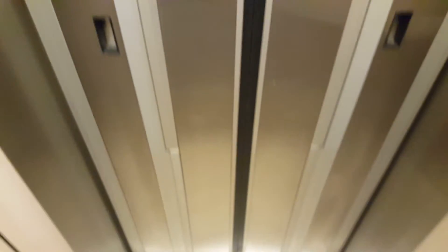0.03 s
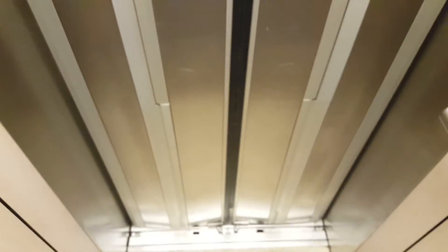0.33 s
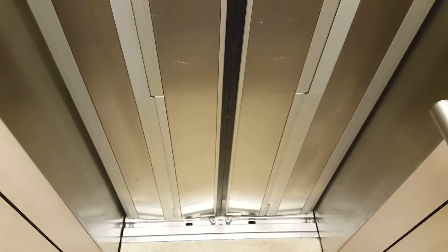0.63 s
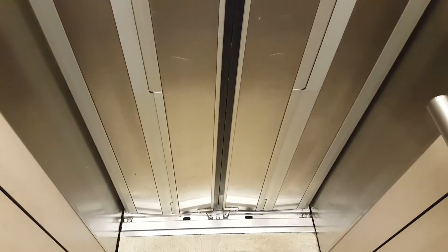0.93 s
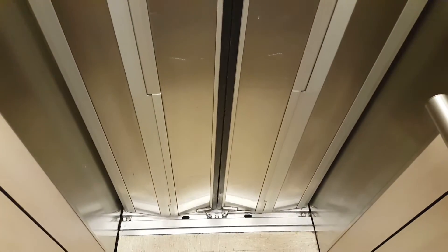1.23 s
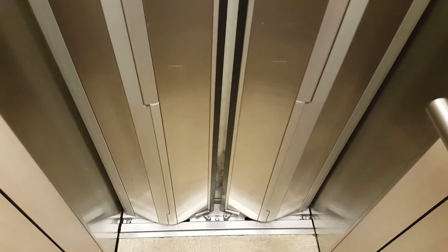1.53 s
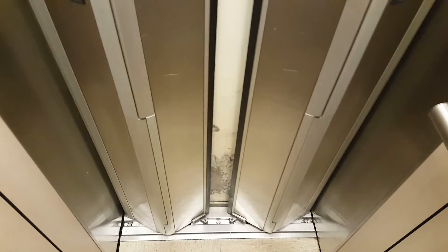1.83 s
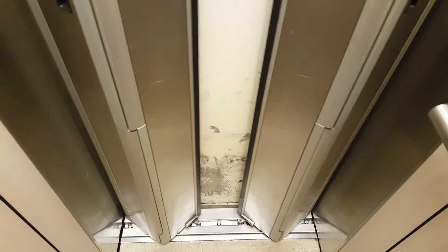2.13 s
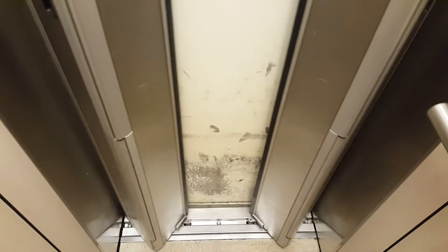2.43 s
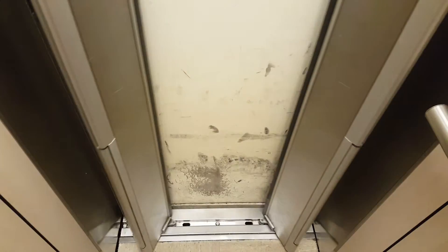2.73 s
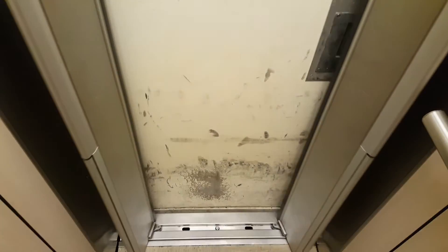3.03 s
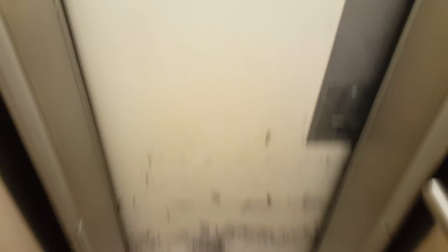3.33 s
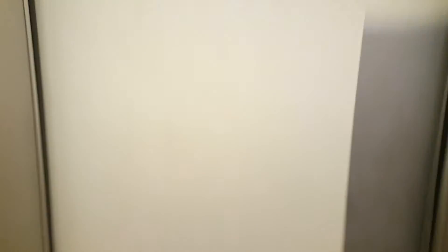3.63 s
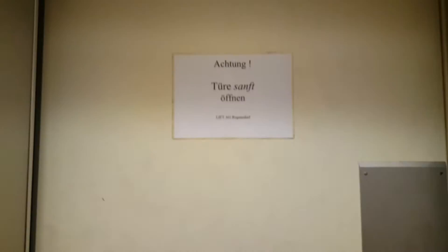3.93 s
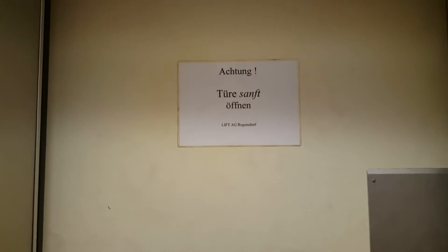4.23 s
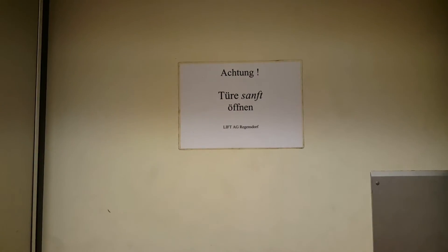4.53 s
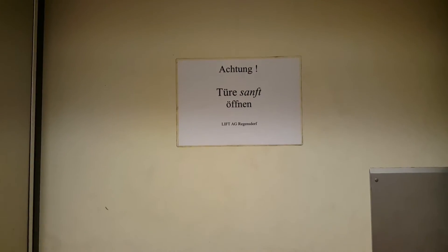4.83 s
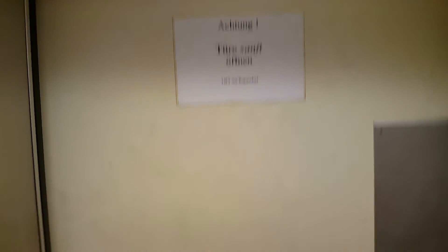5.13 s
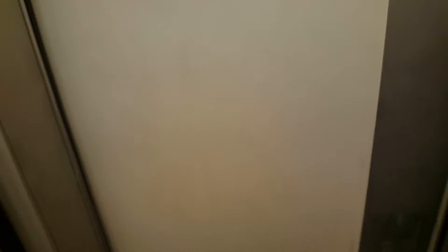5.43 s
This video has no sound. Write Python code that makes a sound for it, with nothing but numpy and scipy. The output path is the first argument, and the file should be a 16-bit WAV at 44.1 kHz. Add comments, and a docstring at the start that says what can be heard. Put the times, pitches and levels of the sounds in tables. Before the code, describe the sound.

Heard up close in a small lift, metal folding doors roll open over a soft machine hum, with uneven rumbling, hollow knocks and sharp ringing clacks. They land with a short squeak and a booming clunk. The rumble dies away, followed by a swish of clothing and a tap on the microphone. Only the faint hum remains until the door drive and rollers start up again near the end.

```python
"""Inside a small lift cabin, stereo microphones close to someone who turns and shifts in rustling clothes.
The lift's hum drops as the steel folding doors open: rollers rumble through the hollow panels,
latch and hinges clack, a linkage rod rings, and the leaves hit their stop with a squeak and a clunk.
A finger bumps the microphone case. After a pause the door drive starts up again."""
import sys
import numpy as np
from scipy import signal
from scipy.fft import rfft, irfft
from scipy.io import wavfile
from scipy.ndimage import uniform_filter1d

SR = 44100
rng = np.random.default_rng(int(sys.argv[2]) if len(sys.argv) > 2 else 0)


def transcribe(u):
    """Save the signal u as a 16-bit wav file named by the first command-line argument.

    u: samples, shape (n,) or (channels, n), limited to [-1, 1]; the rate is SR.
    q: integer samples, one column per channel.
    """
    v = np.clip(np.atleast_2d(u).T, -1, 1)
    q = np.round(v * 32767).astype(np.int16)
    wavfile.write(sys.argv[1], SR, q)


N = 250488
T = np.arange(N) / SR
STOP_S, SLAM_S = 2.669, 2.764  # the leaves meet the stop, then slam home

# modes of the hollow door panels: f/Hz, level/dB, t60/s
PANEL_MODES = [(55.5, 0, 0.71), (91.2, -7, 0.94), (110.1, 0, 1.8), (133.6, -5, 0.34), (173.5, 0, 1.54),
               (209, -10, 0.73), (243.3, -5.5, 0.52), (263, -2.5, 1.18), (299.6, -8, 0.69),
               (346.8, -10.5, 0.39), (420, -11.5, 0.34), (465, -16.5, 0.86), (542.3, -13, 0.65),
               (667, -24.5, 0.36), (848, -19.5, 0.59)]
# stereo width of the cabin at the microphones: f/Hz, side minus mid/dB
STEREO_WIDTH = [(50, -29), (125, -14), (250, -6), (500, -6.5), (1000, 0), (4000, 0)]


def undb(db):
    """Decibels to gain."""
    return 10 ** (np.asarray(db) / 20)


def at_hz(hz, points):
    """Read (Hz, value) points on a log-frequency axis."""
    f, values = np.transpose(points)
    return np.interp(np.log(np.maximum(hz, 1)), np.log(f), values)


def freqs(size):
    """Frequencies of the bins of a spectrum."""
    return np.arange(size // 2 + 1) * SR / size


def peak(f, hz, width_hz):
    """Gain of a narrow resonance."""
    return 1 / (1 + (2 * (f - hz) / width_hz) ** 2)


def ripple(f, step_hz):
    """Crowded resonances of sheet metal: a random pattern over frequency."""
    return np.interp(f / step_hz, np.arange(1024), 1.64 * rng.standard_normal(1024))


def since(s):
    """Seconds gone by since time s, 0 before it."""
    return np.maximum(T - s, 0)


def fade(t, t60):
    """Exponential decay, 60 dB down after t60."""
    return np.exp(-np.log(1000) * t / t60)


def walk(rate_hz):
    """Smooth random drift around zero."""
    hold = int(SR / rate_hz)
    steps = np.repeat(rng.standard_normal(N // hold + 1), hold)
    return uniform_filter1d(uniform_filter1d(steps, hold), hold)[:N]


def add(out, s, x):
    """Mix x into out at time s."""
    i = max(int(s * SR), 0)
    out[:, i:i + x.shape[1]] += x[:, :max(N - i, 0)]


def blows(hits, response):
    """Play one stereo response at each (t/s, level/dB)."""
    out = np.zeros((2, N))
    for s, db in hits:
        add(out, s, undb(db) * response)
    return out


def noise(gain, size=N):
    """Stereo cabin noise of rms 1 with spectrum gain(Hz): bass alike on both sides, treble diffuse."""
    f = freqs(size)
    mid, side = rfft(rng.standard_normal((2, size)))
    width = undb(at_hz(f, STEREO_WIDTH))
    pair = np.array([mid + width * side, mid - width * side]) / np.hypot(1, width)
    shaped = irfft(gain(f) * pair, size)
    return shaped / np.sqrt(np.mean(shaped ** 2))


def tick(hz, octaves, decay_s):
    """A short dying burst of noise around one pitch."""
    t = T[:2 ** 12]
    band = noise(lambda f: np.exp(-.5 * (np.log2((f + 1) / hz) / octaves) ** 2), len(t))
    return band * np.exp(-t / decay_s)


def ring(modes, size, rise_s, flutter_db, flutter_hz):
    """Struck modes: reflections make each flutter, and high ones reach the microphones out of phase."""
    t, out = T[:size], 0
    for hz, db, t60 in modes:
        phase, apart, *levels = rng.standard_normal(128)
        sides = np.array([[1], [-1]]) * apart * undb(at_hz(hz, STEREO_WIDTH))
        flutter = flutter_db * np.interp(t * flutter_hz, np.arange(len(levels)), levels)
        out = out + undb(db + flutter) * fade(t, t60) * np.sin(2 * np.pi * (hz * t + phase) + sides)
    nominal_rms = np.sqrt(sum(undb(db) ** 2 for _, db, _ in modes) / 2)
    return out * (1 - np.exp(-t / rise_s)) / nominal_rms


def hum(motor_off_s=1.4, air_db=-57, running_air_db=3):
    """Shaft air murmurs under machine tones; most drop as the lift motor stops. Electronics whine on."""
    # air in the shaft: f/Hz, relative density/dB
    shaft_air = [(13, -50), (22, -12.5), (102, -8.5), (198, -14), (227, -15), (352, -21), (392, -29),
                 (450, -18), (489, -26), (869, -27), (1210, -35.5), (1730, -36.5), (15500, -58.5)]
    # machine tones: f/Hz, level with the motor on/dB, level with it off/dB, width/Hz
    machine_tones = [(56.6, -54.5, -61, 5.8), (100.3, -64, -57.5, 1.8), (177.9, -57, -80, 8.6),
                     (225, -64, -74, 1.6), (301.5, -69, -75, 10.4), (449, -62, -77.5, 10.4)]
    # thin electronic whines: f/Hz, level/dB, width/Hz
    whines = [(8839, -81.5, 130), (11700, -86, 300), (12720, -88, 250)]
    running = np.clip((motor_off_s - T) / .1 + 1, 0, 1)
    out = noise(lambda f: undb(at_hz(f, shaft_air))) * undb(air_db + running_air_db * running)
    for hz, on_db, off_db, width_hz in machine_tones:
        out += noise(lambda f: peak(f, hz, width_hz)) * undb(off_db + (on_db - off_db) * running)
    for hz, db, width_hz in whines:
        out += noise(lambda f: peak(f, hz, width_hz)) * undb(db)
    return out


def creaks():
    """The cabin gives small pitched creaks around the microphones."""
    # creaks: t/s, level/dB, f/Hz, width/octaves
    cabin_creaks = [(0.516, -54, 2500, .23), (3.736, -39.5, 2850, .05), (4.114, -53, 1970, .4),
                    (5.141, -49, 5800, .07), (5.145, -47, 2330, 0.089)]
    out = np.zeros((2, N))
    for s, db, hz, octaves in cabin_creaks:
        add(out, s, undb(db) * tick(hz, octaves, decay_s=0.014))
    return out


def clothes(still_db=-81, rise_db_per_s=71, fall_db_per_s=63):
    """Close by, cloth swells, ticks and dies away with the turns of the body."""
    # turns at full swing: from t/s, until t/s, level/dB
    turns = [(0, 0.305, -60), (3.371, 3.757, -46), (5.27, 5.68, -49.5)]
    # sliding cloth: f/Hz, relative density/dB
    cloth_colour = [(290, -27), (500, -6.5), (620, -18), (758, -2.5), (827, -11), (1450, -15),
                    (1960, -12.5), (5750, -22), (9240, -24), (15500, -28)]
    # sharp ticks of the cloth: t/s, level/dB, f/Hz
    cloth_ticks = [(.296, -47.5, 10300), (3.254, -46, 5500), (3.398, -39.5, 9000), (3.508, -31, 4500),
                   (3.611, -41.5, 7000)]
    sliding = undb(still_db)
    for start, end, db in turns:
        time_to_go = np.maximum(start - T, 0)
        sliding = sliding + undb(db - rise_db_per_s * time_to_go - fall_db_per_s * since(end))
    out = noise(lambda f: undb(at_hz(f, cloth_colour))) * sliding
    out *= undb(1.56 * walk(25.06) + 1.54 * walk(500))  # the rustle flickers
    for s, db, hz in cloth_ticks:
        add(out, s, undb(db) * tick(hz, octaves=1, decay_s=0.0025))
    return out


def finger_bump(s=3.757, bump_hz=150, bump_db=-20, tap_hz=900, tap_db=-17, left_db=-14):
    """A finger bumps the case by the right microphone."""
    out, t = np.zeros((2, N)), T[:2 ** 12]
    bump = undb(bump_db) * np.sin(2 * np.pi * bump_hz * t) * fade(t, t60=0.045)
    tap = undb(tap_db) * np.sin(2 * np.pi * tap_hz * t) * fade(t, t60=0.0045)
    add(out, s, np.outer([undb(left_db), 1], tap - bump))
    return out


def door_motor():
    """Overhead, the door motor drones through the cabin roof as it takes up the load."""
    # motor tones: f/Hz, relative level/dB, width/Hz
    tones = [(110.3, -3, 24), (177, 3, 8.1), (328.5, -8, 9.2)]
    # drone under load: t/s, level/dB
    load = [(5.12, -98), (5.2, -61), (5.46, -44.5), (5.51, -34.5), (5.68, -38.5)]
    drone = noise(lambda f: sum(undb(db) * peak(f, hz, width_hz) for hz, db, width_hz in tones))
    return drone * undb(np.interp(T, *np.transpose(load)))


def rollers(attack_s=0.034, release_s=0.25, surge_db=5, surge_s=0.25, ease_db_per_s=3.5, shudder_s=0.18):
    """Rollers run unevenly in the track and shake the panels, surging at each start."""
    # runs of the door drive: from t/s, until t/s, base rumble level/dB, base roller level/dB
    runs = [(1.049, 3.764, -38, -49), (5.135, 5.68, -48, -44.5)]
    # rollers in the track: f/Hz, relative density/dB
    track_colour = [(120, -16), (220, -6), (400, -6.5), (600, -8), (1000, -11), (1400, -20.5),
                    (2300, -22.5), (3500, -33), (7000, -39.5), (14000, -49)]
    shudder = (T > SLAM_S) * np.exp(-since(SLAM_S) / shudder_s)
    shaking, rolling = undb(-27.5) * shudder, undb(-36) * shudder
    for start, end, rumble_db, roller_db in runs:
        age = since(start)
        surge = undb(surge_db * np.exp(-age / surge_s))  # extra effort to get the leaves moving
        effort = (1 - np.exp(-age / attack_s)) * surge * np.exp(-since(end) / release_s)
        shaking = np.hypot(shaking, effort * undb(rumble_db - ease_db_per_s * age))
        rolling = np.hypot(rolling, effort * undb(roller_db))
    panels = noise(lambda f: np.sqrt(sum(undb(2 * db) / (1 + ((f - hz) / (5 + 0.02 * hz)) ** 2) ** 1.71
                                         for hz, db, _ in PANEL_MODES)))
    rumble = panels * shaking * undb(3 * walk(9))
    track = noise(lambda f: undb(at_hz(f, track_colour) + 3 * ripple(f, step_hz=28)))
    grain = undb(1.5 * walk(150) + 2 * walk(25.17))
    return rumble + track * rolling * grain


def hinge_squeak(s=2.693, length_s=0.083, db=-38, hz=3705, lower_hz=1892, lower_db=-6, width_hz=140):
    """A dry hinge squeaks as the leaves press into their stop."""
    size = int(length_s * SR)
    tone = noise(lambda f: peak(f, hz, width_hz) + undb(lower_db) * peak(f, lower_hz, width_hz), size)
    return blows([(s, db)], tone * signal.windows.tukey(size, .5))


def linkage_rod():
    """A linkage rod is knocked as the leaves fold and sings on."""
    # knocks on the rod: t/s, level/dB
    knocks = [(1.654, -54), (1.88, -52), (2.062, -52), (2.323, -43)]
    # modes of the rod: f/Hz, level/dB, t60/s
    rod_modes = [(2369, -4, .15), (2469, 0, .52), (4216, -4, .14)]
    return blows(knocks, ring(rod_modes, 2 ** 15, rise_s=0.0081, flutter_db=4.5, flutter_hz=89))


def panel_thuds(stop_db=-19.5, slam_db=-14, boom_db=-12.5, push_s=0.0052):
    """A blow flexes a leaf for a few cycles, then the hollow panels boom on."""
    # soft blows on the panels: t/s, f/Hz, level/dB
    soft_blows = [(0.765, 183, -44), (1.025, 56.5, -36.5), (1.026, 231, -42), (1.115, 92, -37),
                  (1.165, 119, -31), (1.204, 242, -31), (1.37, 259, -34), (1.659, 259, -30.5),
                  (1.858, 264, -29.5), (2.084, 93, -32.5), (2.191, 61, -36.5), (2.879, 71, -30.5),
                  (2.96, 108, -24), (3.119, 170, -36.5)]
    # modes of the stop: f/Hz, relative level/dB
    stop_modes = [(322, -6.5), (550, -10), (632, -7.5), (1150, -19)]
    # modes of the folded leaves: f/Hz, relative level/dB
    leaf_modes = [(95.5, -9), (154, -0.5), (202, -6.5)]
    hits = [(s, db, [(hz, 0)]) for s, hz, db in soft_blows]
    hits += [(STOP_S, stop_db, stop_modes), (SLAM_S, slam_db, leaf_modes)]
    out, t = np.zeros((2, N)), T[:2 ** 13]
    boom = ring(PANEL_MODES, 2 ** 16, rise_s=0.0086, flutter_db=3.5, flutter_hz=24.5)
    push = 2 * (1 - np.exp(-(t / push_s) ** 2)) * fade(t, t60=0.15)
    for s, db, modes in hits:
        add(out, s, undb(db + boom_db) * boom)
        for hz, mode_db in modes:
            sides = np.array([[1], [-1]]) * undb(at_hz(hz, STEREO_WIDTH))
            add(out, s, undb(db + mode_db) * push * np.sin(2 * np.pi * hz * t + sides))
    return out


def clacks(rise_s=0.0037, crack_db=2, crack_s=0.002, linger_db=-30, latch_db=1.5, hinge_db=-4):
    """Metal contacts fill the steel cabin with a dense wash; a struck latch or hinge rings on."""
    # metal contacts: t/s, level/dB, brightness/dB per octave, part struck
    contacts = [(1.085, -47.5, -3, "frame"), (1.1, -46.5, -5, "frame"), (1.13, -49.5, -9.5, "frame"),
                (1.197, -38, -1.5, "frame"), (1.298, -51, 3.5, "frame"), (1.356, -30.5, 4, "latch"),
                (1.41, -46.5, 5.5, "latch"), (1.505, -43.5, -2.5, "frame"), (1.557, -50.5, -6, "frame"),
                (1.651, -43, -2, "hinge"), (1.709, -43.5, 3.5, "frame"), (1.852, -49, -3, "frame"),
                (1.87, -30, 3, "hinge"), (1.884, -35.5, 0, "frame"), (2.058, -38, 1, "latch"),
                (2.104, -47, 2.7, "latch"), (2.322, -43.5, -1.5, "hinge"), (2.38, -48.5, 3, "frame"),
                (2.659, -44, -0.5, "frame"), (2.67, -30, -3, "frame"), (2.698, -35.5, 1, "frame"),
                (2.728, -42, 3, "frame"), (2.764, -29, -0.5, "frame"), (2.783, -30, 0.5, "frame"),
                (2.812, -44.5, 4.5, "frame"), (3.163, -58, -6.5, "frame"), (3.733, -47.5, 10, "frame"),
                (5.14, -46, -2, "frame"), (5.445, -40, 6, "frame")]
    # colour of each part at brightness 0: f/Hz, gain/dB
    part_colour = {"frame": [(600, -1.5), (1700, 1.5), (3000, -3), (6700, -4), (12500, -19.5)],
                   "latch": [(600, 0.5), (1700, -4), (3000, -0.5), (6700, -3), (12500, -22)],
                   "hinge": [(600, -4.5), (1700, 1.5), (3000, 0), (6700, -3.5), (12500, -25)]}
    # colour of the steel at every contact: f/Hz, gain/dB
    steel_colour = [(4500, 2), (6600, 1), (8300, 3.5), (9400, 8), (10500, 2.5), (15000, 5)]
    # reverberation of the cabin: f/Hz, t60/s
    cabin_decay = [(200, 0.18), (700, 0.1875), (2500, 0.26), (7000, 0.19), (14000, 0.1)]
    # modes of the latch: f/Hz, level/dB, t60/s
    latch_modes = [(2470, -7, .38), (2662, 0, .17), (2725, -9, .2), (2877, -11, .35), (3179, -8, .22),
                   (3557, 0, .15), (3637, 0, .15), (4955, -10, .19), (6168, -6, .19)]
    # modes of the hinges: f/Hz, level/dB, t60/s
    hinge_modes = [(1015, -2, .32), (1345, -9, .2), (1895, -5, .22), (2470, -2, .2), (2963, -4, .17),
                   (3525, -5, .17), (4216, -2, .17), (4860, -8, .15), (5400, -11, .15), (8270, -12, .13)]
    out, size = np.zeros((2, N)), 2 ** 14
    t, f = T[:size], freqs(size)
    centres = 300 * 2 ** (np.arange(13) / 2)  # half-octave bands, each with its own decay
    bands = np.cos(np.pi / 2 * np.clip(2 * np.log2((f + 1) / centres[:, None]), -1, 1)) ** 2
    linger = undb(linger_db) * fade(t, t60=1.0)
    tails = np.array([fade(t, at_hz(hz, cabin_decay)) + linger / (1 + (hz / 4000) ** 2)
                      for hz in centres])
    # the first reflections pile up within milliseconds, and the direct crack rides on top
    attack = (1 - np.exp(-(t / rise_s) ** 2)) * (1 + undb(crack_db) * np.exp(-t / crack_s))
    for s, db, brightness, part in contacts:
        burst = noise(lambda f: undb(2.5 * ripple(f, step_hz=170)), size) * attack
        # a harder contact tilts the colour of its part towards the treble
        colour = [(hz, db + part_db + brightness * np.log2(hz / 2400))
                  for hz, part_db in part_colour[part]]
        gains = undb(at_hz(centres, colour)) / 2 / np.sqrt(bands.mean(axis=1))
        spectrum = (rfft(burst[:, None] * tails) * bands * gains[:, None]).sum(axis=1)
        wash = irfft(spectrum * undb(at_hz(f, steel_colour)), size)
        add(out, s, wash[:, :-size // 8])
    for name, modes, ring_db in (("latch", latch_modes, latch_db), ("hinge", hinge_modes, hinge_db)):
        hits = [(s, db + ring_db) for s, db, _, part in contacts if part == name]
        out += blows(hits, ring(modes, size, rise_s=0.006, flutter_db=5, flutter_hz=134))
    return out


def scene():
    """The doors at close range, over the small sounds of the cabin and its passenger."""
    doors = clacks() + linkage_rod() + panel_thuds() + rollers() + door_motor() + hinge_squeak()
    return doors + creaks() + clothes() + finger_bump() + hum()


def record(dry, hiss_db=-77, top_hz=15700):
    """The microphones hiss faintly, the right is brighter than the left, and the top is cut steeply."""
    # balance of the microphone pair: f/Hz, right minus left/dB
    balance = [(500, 0), (1000, 0.5), (4000, 4.5), (8000, 1.5), (12500, 8.5)]
    tilt_db = at_hz(freqs(N), balance) * np.array([[-.5], [.5]])
    hiss = undb(hiss_db) * rng.standard_normal((2, N))
    heard = irfft(rfft(dry) * undb(tilt_db), N) + hiss
    return signal.sosfiltfilt(signal.ellip(8, .1, 60, top_hz, fs=SR, output="sos"), heard)


dry = scene()
out = record(dry)
transcribe(out)
```